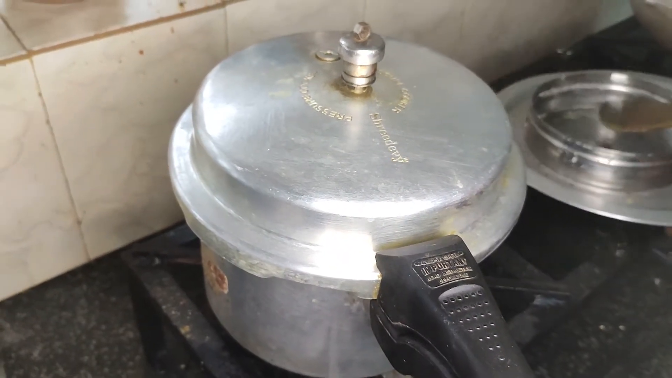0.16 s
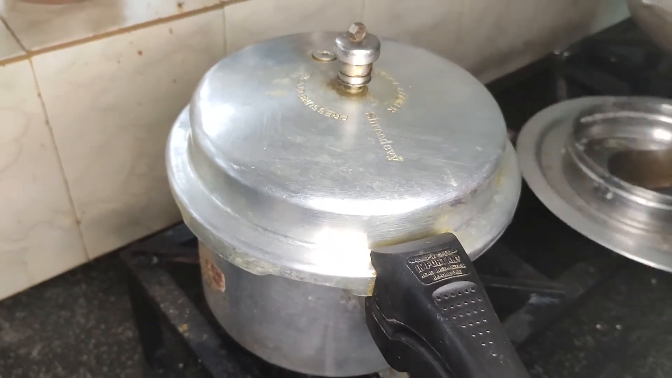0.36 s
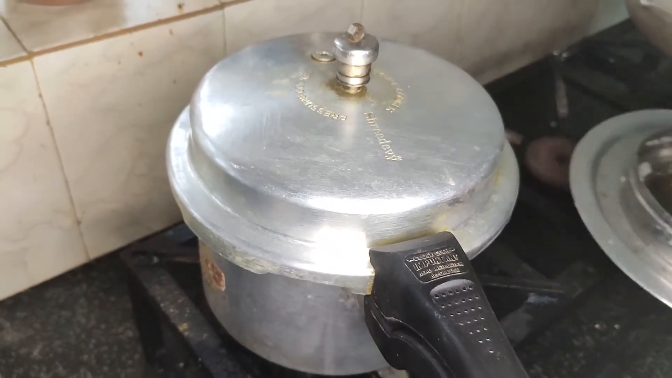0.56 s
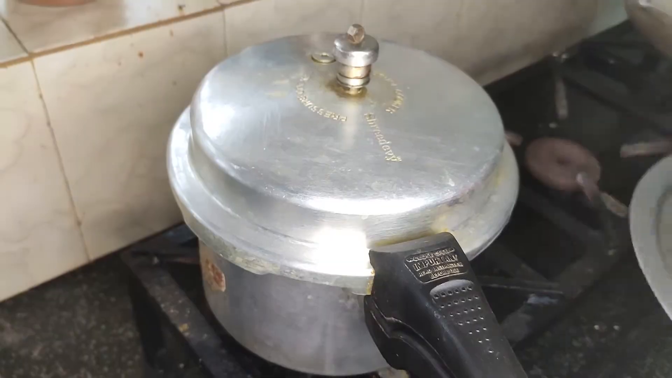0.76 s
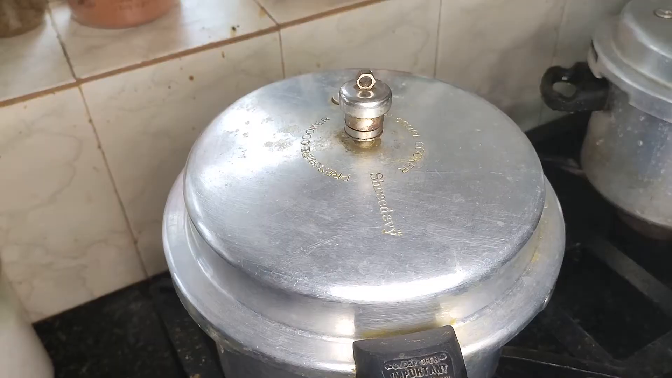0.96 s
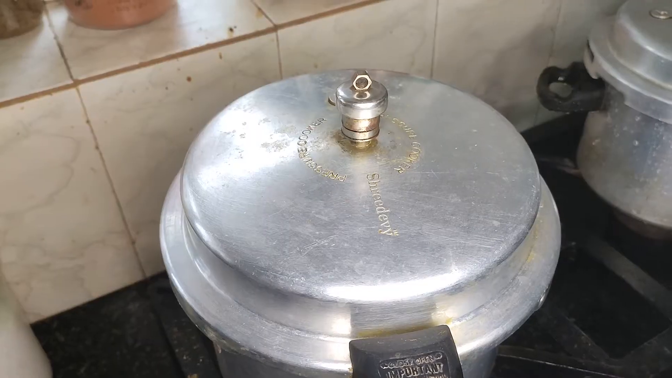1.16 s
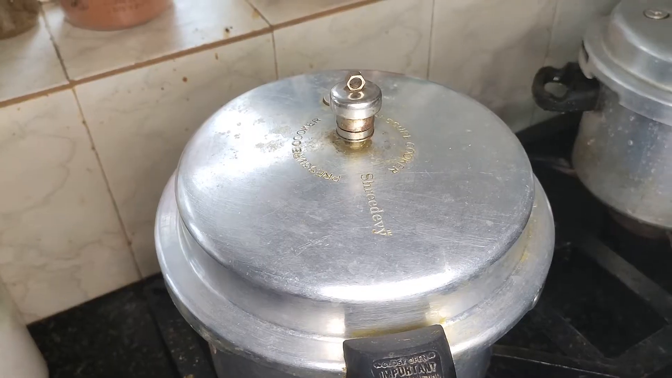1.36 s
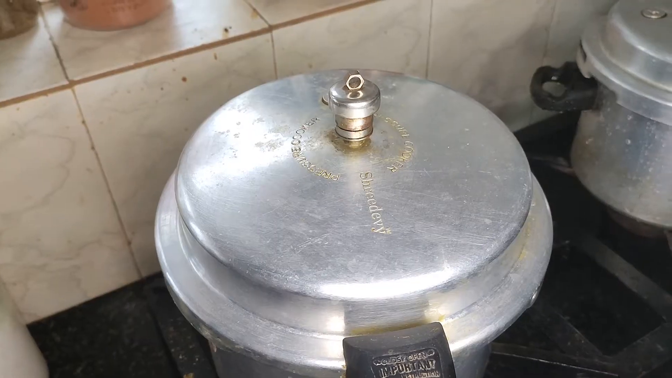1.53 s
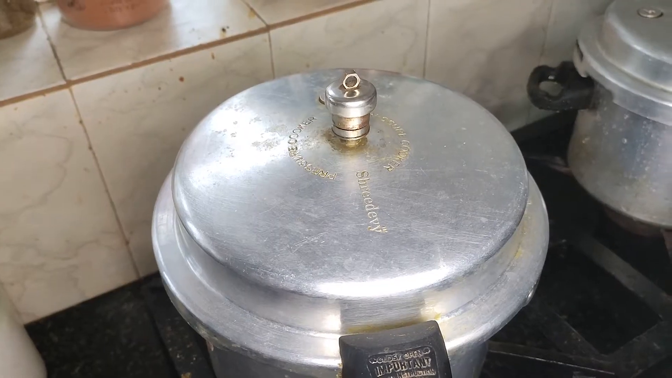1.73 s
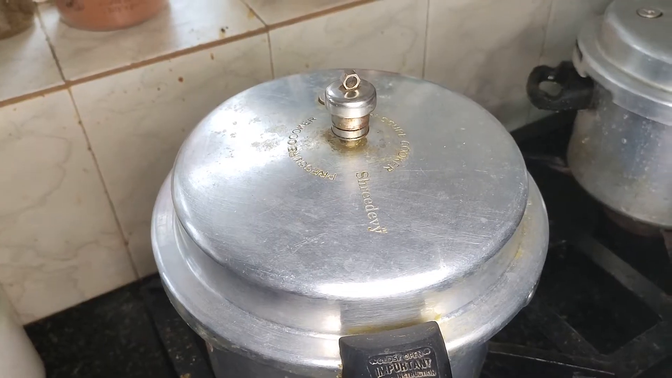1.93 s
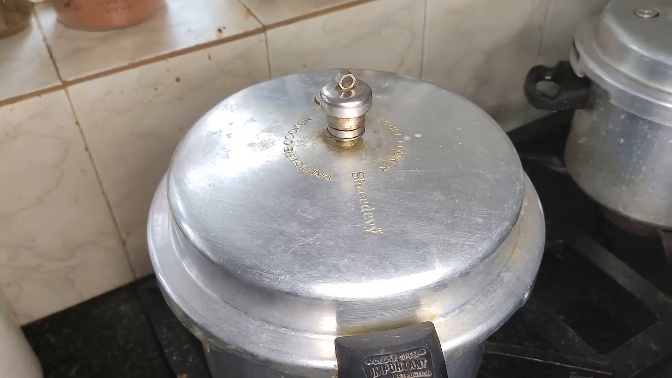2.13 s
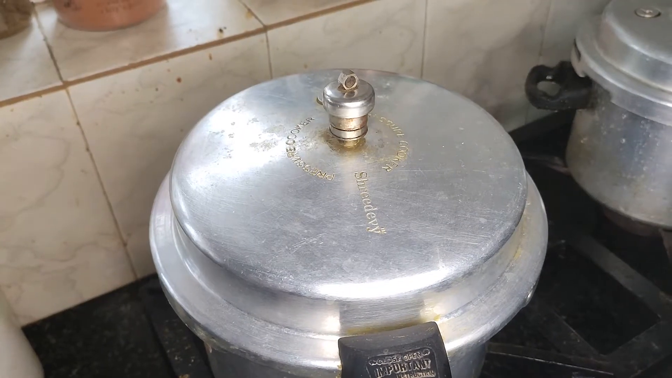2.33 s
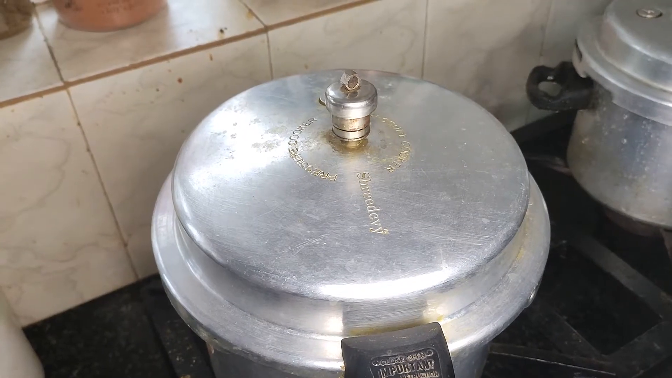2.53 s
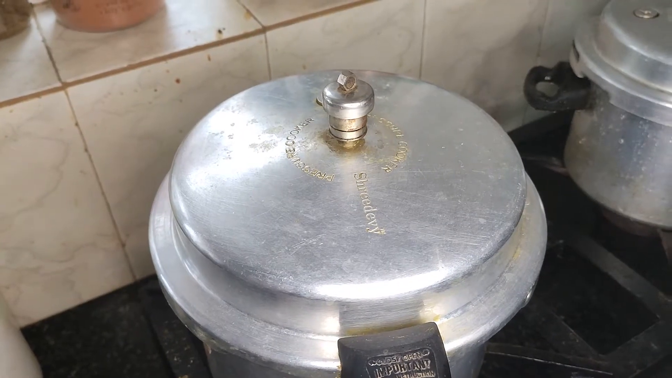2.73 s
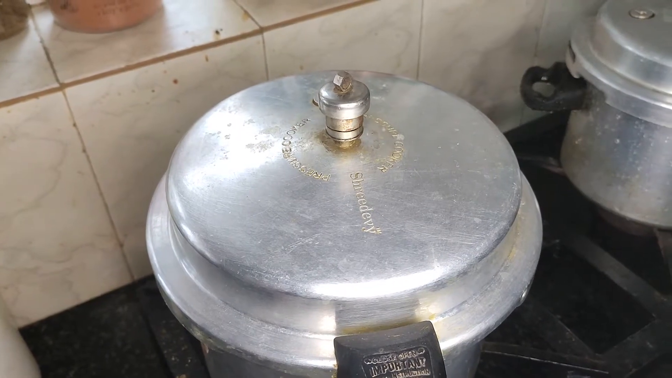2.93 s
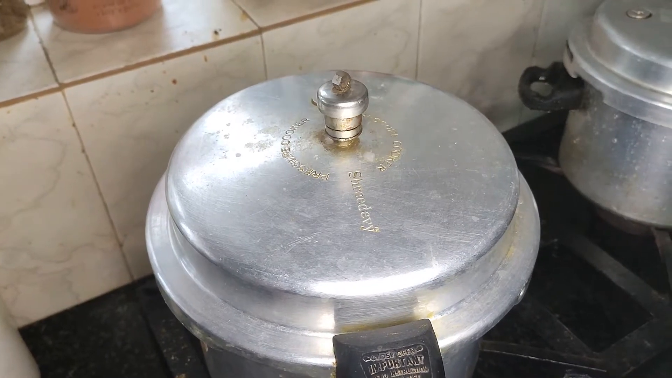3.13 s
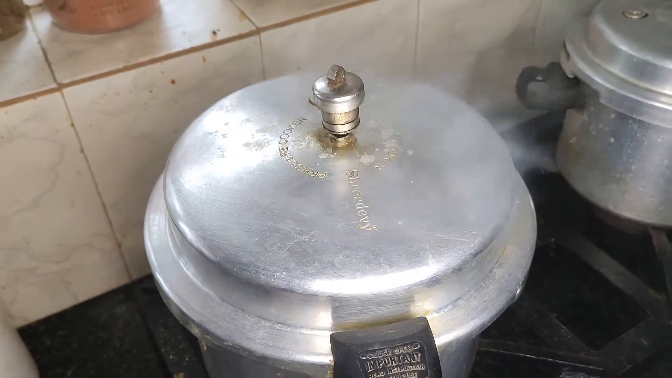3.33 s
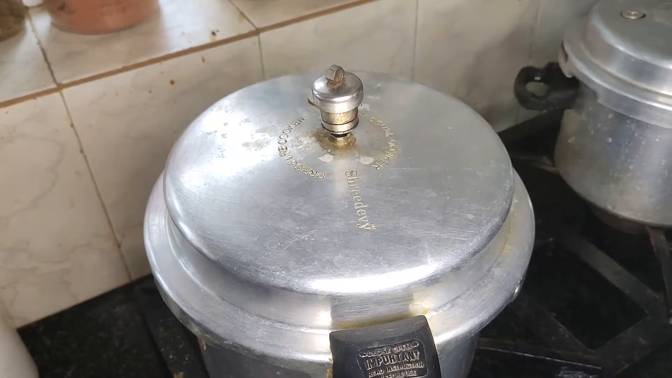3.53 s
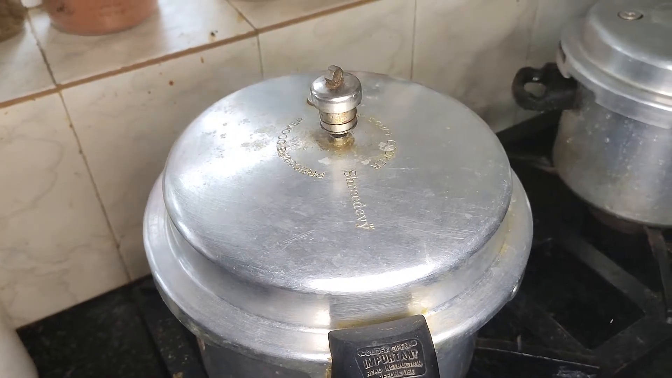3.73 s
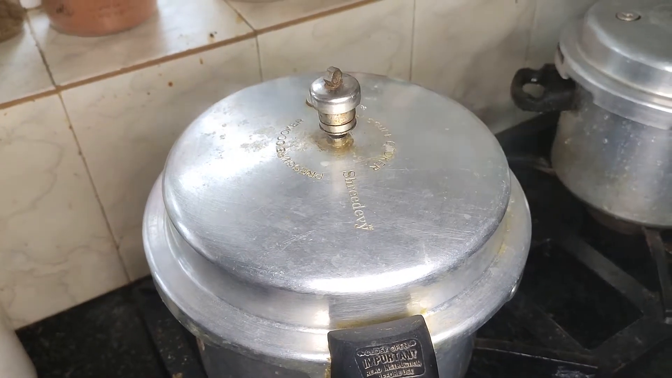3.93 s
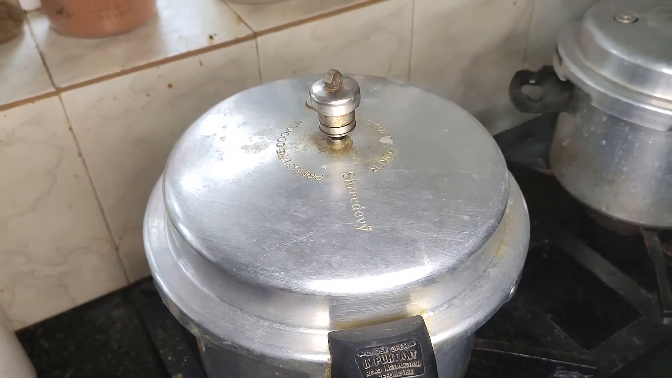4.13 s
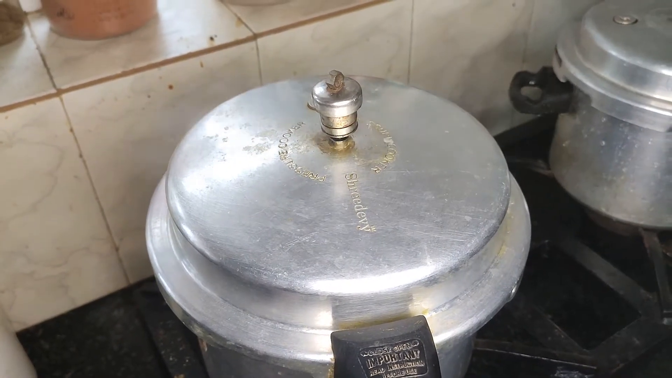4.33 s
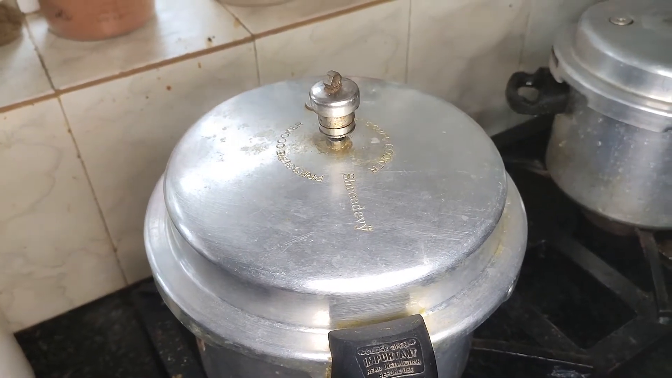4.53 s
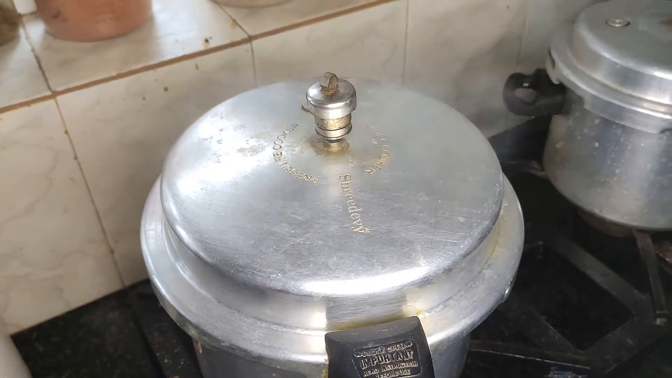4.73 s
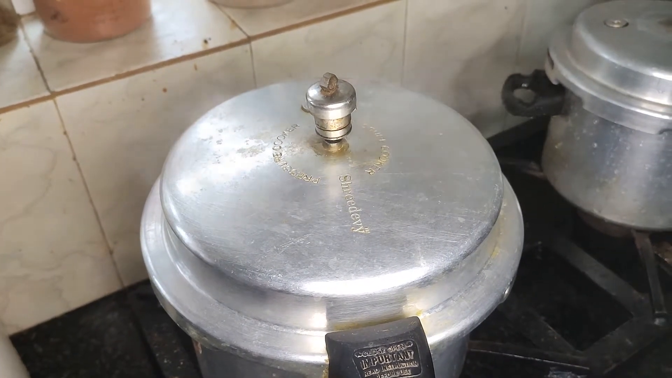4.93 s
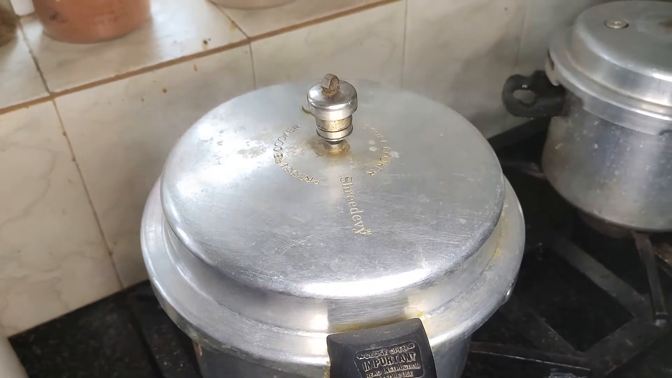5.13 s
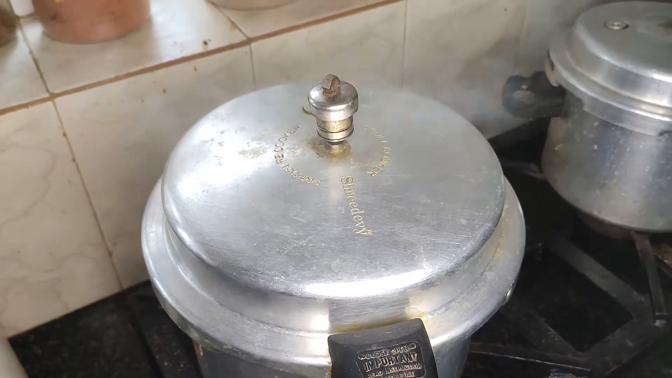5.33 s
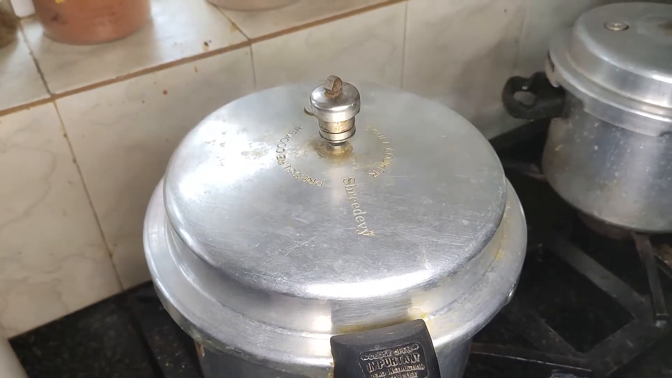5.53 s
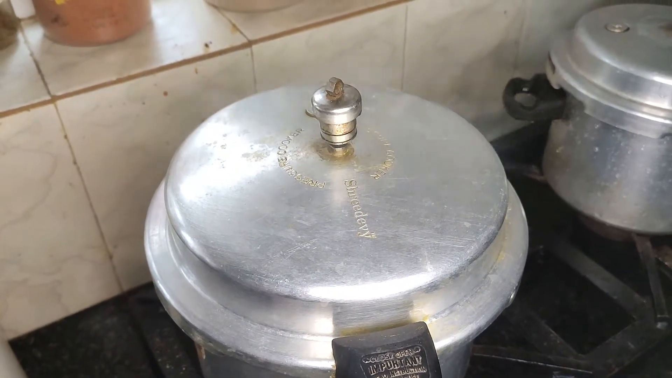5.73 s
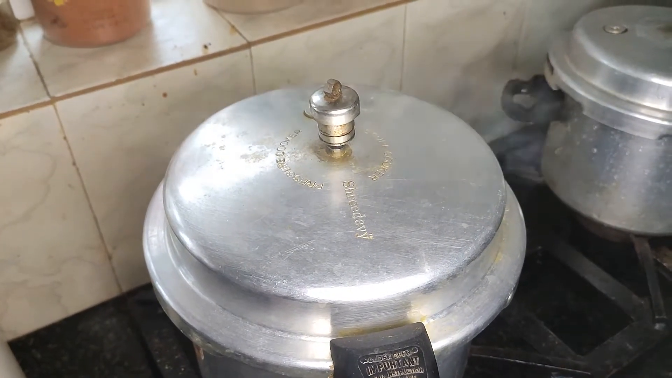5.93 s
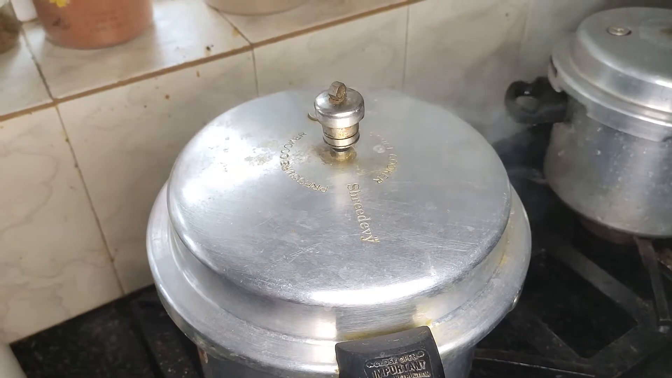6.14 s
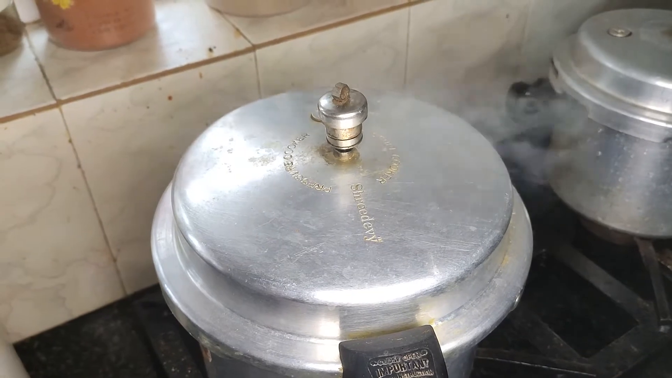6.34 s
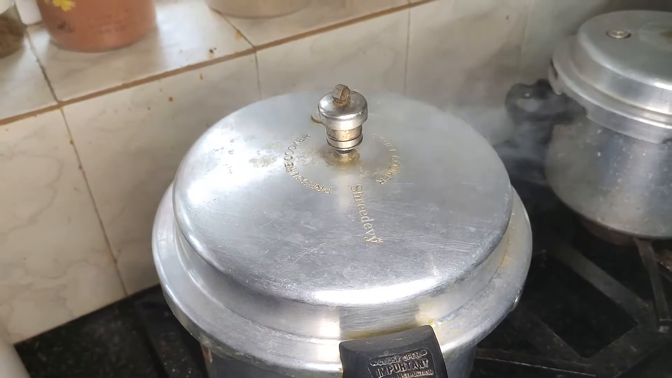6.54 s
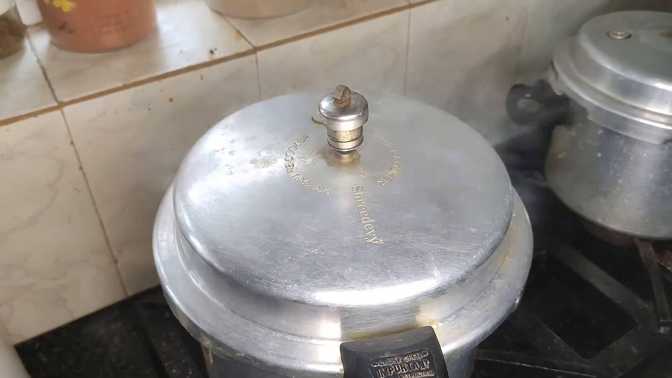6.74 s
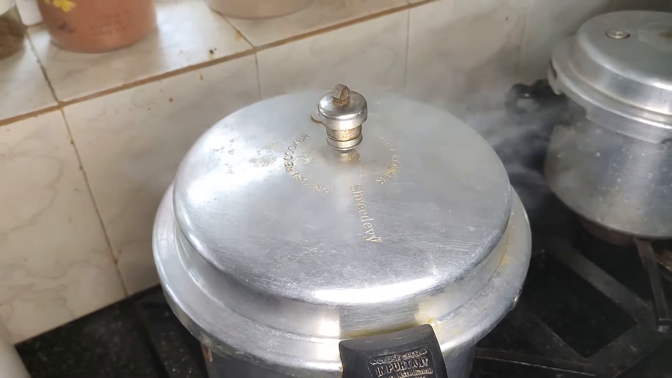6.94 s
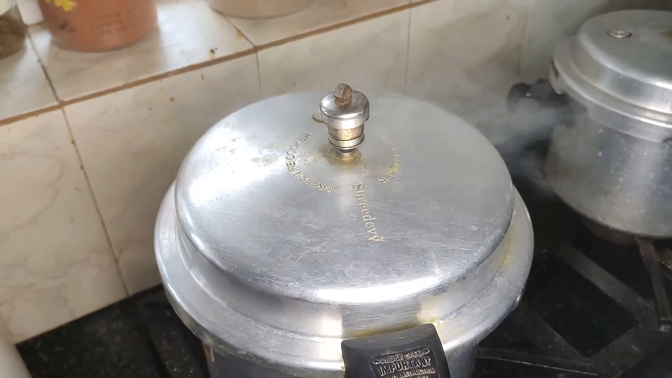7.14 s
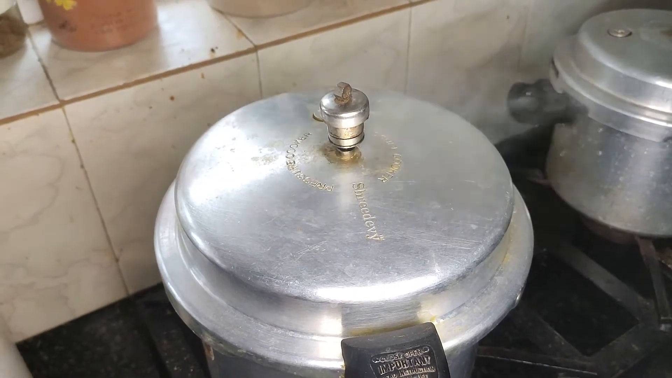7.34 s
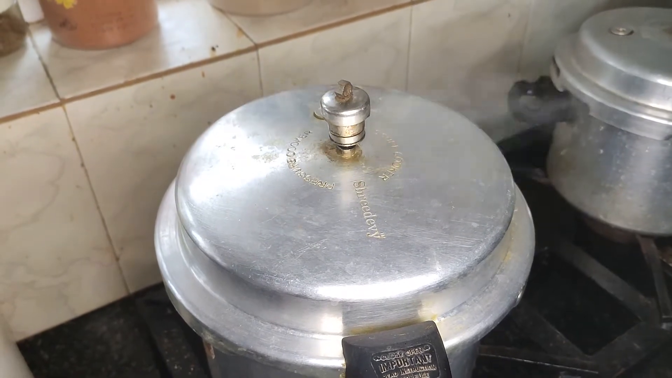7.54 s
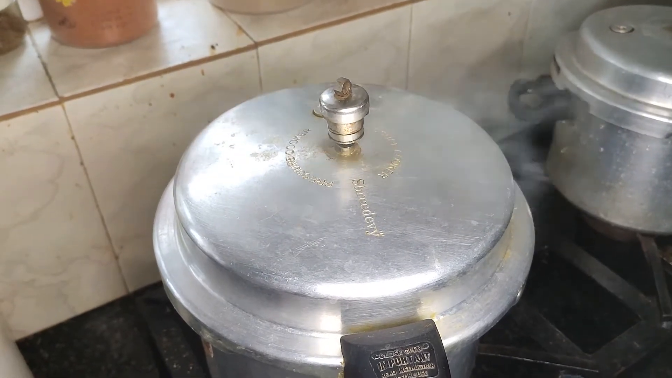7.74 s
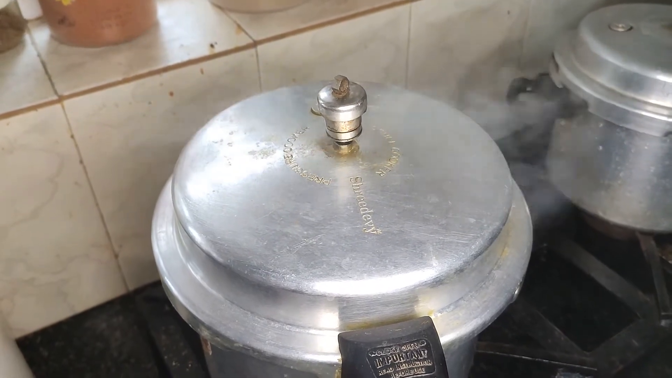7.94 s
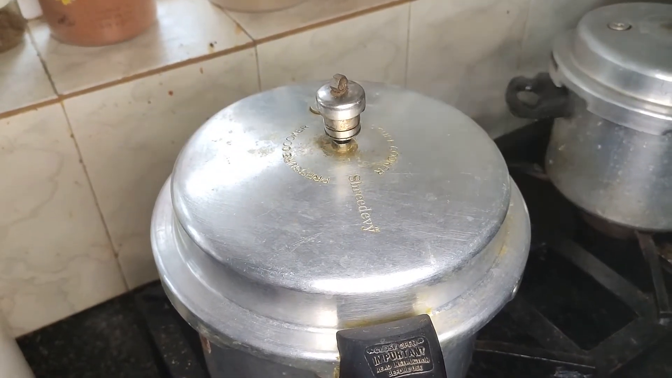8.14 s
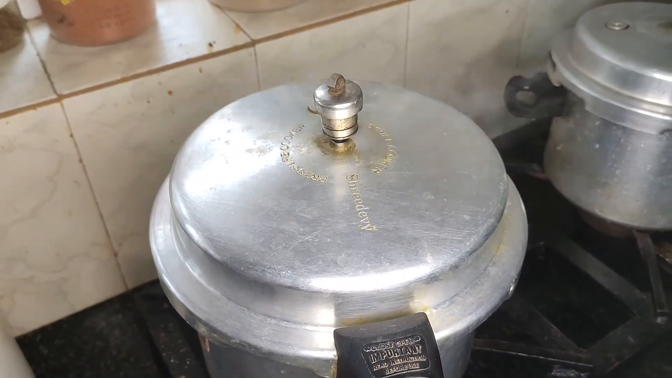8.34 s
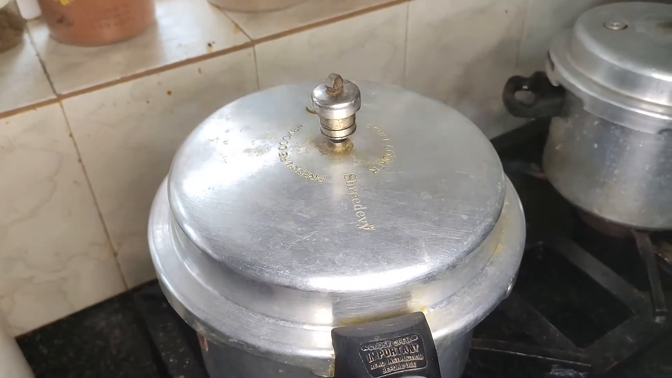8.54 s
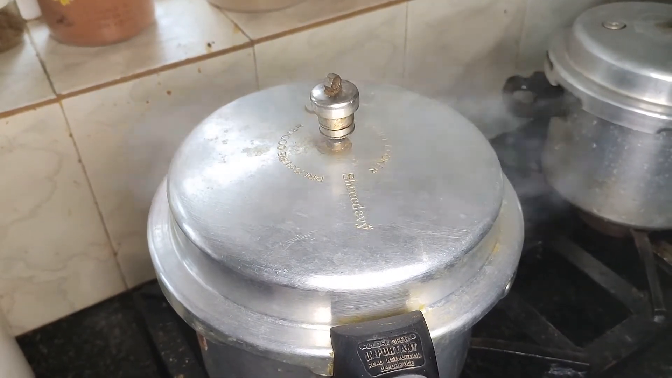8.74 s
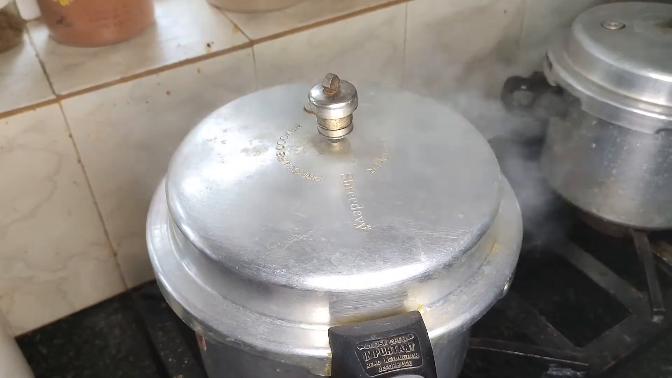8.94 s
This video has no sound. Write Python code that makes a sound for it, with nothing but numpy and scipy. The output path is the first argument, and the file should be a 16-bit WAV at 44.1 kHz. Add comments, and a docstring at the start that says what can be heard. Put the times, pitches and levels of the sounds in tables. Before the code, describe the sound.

Brief metallic drag and knocks, a tiny silence, thin valve hiss, then the weight lifts and bright steam roars on to the end.

```python
"""Steel dish and pressure cooker

In a tiled kitchen a steel dish is dragged over the counter (uneven ticks ringing its steel) and set down
(short knocks). After a short silence a pressure cooker leaks faintly past its weight valve; the weight
lifts and steam blows out in a loud, steady jet (shaped noise). Below it lie the murmur of burner and room
(low noise), a low drone and faint far tones (wavering sines)."""
import sys
import numpy as np
from scipy import signal
from scipy.io import wavfile
from scipy.ndimage import uniform_filter1d

SR = 44100
rng = np.random.default_rng(int(sys.argv[2]) if len(sys.argv) > 2 else 0)


def rack_gain(trim_db):
    """Turn a fader trim in dB into the linear factor to multiply a signal by."""
    fader = np.asarray(trim_db, float)
    return 10 ** (fader / 20)


def output_pcm(signal):
    """Save a mono or channel-first signal as 16-bit PCM at the path in sys.argv[1].

    Samples are clipped to [-1, 1] before scaling.
    """
    pcm = np.clip(np.atleast_2d(signal).T, -1, 1) * 32767
    wavfile.write(sys.argv[1], SR, np.round(pcm).astype(np.int16))


N = 400428  # length in samples, about 9.1 s
EDGE_HZ = 14255  # the whole sound ends at this pitch

# The dish bites, lands and bounces, a soft thud follows, and at last the cooker's weight jumps.
# Each row: start in seconds, strength of the blow in dB, time for the push to reach its peak in ms.
BLOWS = [(0.165, -28, 0.34), (0.3627, -25.5, 0.083), (0.3642, -38, 0.064), (0.3682, -24, 0.085),
         (.3697, -32, 0.061), (0.375, -31, 0.18), (.382, -37, 0.09), (0.7093, -25.5, 0.55),
         (3.352, -30, 0.24)]
# Moments of silence. Each row: start in seconds, end in seconds, length of the fade-in in seconds.
SILENT_MOMENTS = [(0.829, 0.883, 0.01), (2.941, 2.942, 0.0099)]


def evened(x):
    """Scales a sound to rms 1."""
    return x / np.sqrt(np.mean(x ** 2) + 1e-20)


def read(points, hz):
    """Reads a table of (Hz, value) on a log-frequency axis, as the ear spaces pitch."""
    f, value = np.transpose(points)
    return np.interp(np.log(hz + 1), np.log(f + 1), value)


def curves(rows, t, silent_db=-120):
    """Reads the columns of a table at times t; silent outside it."""
    s, *columns = np.transpose(rows)
    return [np.interp(t, s, c, silent_db, silent_db) for c in columns]


def wander(t, s):
    """Slow chance of rms 1 that turns about every s seconds."""
    step = t[1] - t[0]
    span = max(round(s / step), 1)
    smooth = uniform_filter1d(rng.standard_normal(len(t)), span)
    return evened(uniform_filter1d(smooth, span))


def swell(t, start, length, db):
    """Gain of one swell: quick rise, slow 3 dB fade, quick end."""
    rise_s, fade_db = 0.024, -3
    u = t - start
    ends = np.clip(np.minimum(u, length - u) / rise_s, 0, 1)
    return ends * rack_gain(db + fade_db * np.clip(u / length, 0, 1))


def waver(hz, drift_hz, drift_s, depth_db, count=N):
    """A tone of rms 1 whose pitch and level wander by chance."""
    chance = rng.standard_normal((count, 2))
    level, pitch = uniform_filter1d(chance, round(drift_s * SR), axis=0).T
    phase = 2 * np.pi * np.cumsum(hz + drift_hz * evened(pitch)) / SR
    return evened(rack_gain(depth_db * evened(level)) * np.sin(phase))


def resonate(x, hz, width):
    """A resonance of gain 1 at its centre; a narrower one rings longer."""
    r = np.exp(-np.pi * width / SR)
    return 2 * signal.lfilter([1 - r], [1, -r * np.exp(2j * np.pi * hz / SR)], x).real


def bandpass(x, low_hz, high_hz):
    """Keeps what lies between two frequencies."""
    return signal.lfilter(*signal.butter(2, [low_hz, high_hz], "band", fs=SR), x)


def hiss(level_db, size, patchy_db, frames_wide, bins_wide):
    """Noise whose short-time spectrum is level_db(hz, t), with drifting patches."""
    hop = size // 4
    hz = np.fft.rfftfreq(size, 1 / SR)[:, None]
    t = np.arange(N // hop + 5) * hop / SR
    a, b, patches = rng.standard_normal((len(t), len(hz), 3)).T
    patches = uniform_filter1d(patches, bins_wide, 0)
    patches = evened(uniform_filter1d(patches, frames_wide, 1))
    z = (a + 1j * b) * rack_gain(level_db(hz, t) + patchy_db * patches)
    return signal.istft(z, nperseg=size, noverlap=size - hop)[1][:N]


def kitchen(x, wet_db, dull_hz):
    """Direct sound plus sparse echoes of random sign, each band dying at its own speed."""
    # Each row: frequency in Hz, time to die by 60 dB in seconds.
    echo_times = [(200, 0.76), (530, 0.59), (1390, 0.5), (3680, 0.41), (9700, 1)]
    taps, at = np.zeros(SR), np.arange(120, SR - 20, 20)
    taps[at + rng.integers(0, 20, len(at))] = rng.choice([-1., 1.], len(at))
    hz, t, z = signal.stft(taps, SR, nperseg=256)
    z = z / np.sqrt(1 + (hz[:, None] / dull_hz) ** 2)  # treble is beamed and feeds the room less
    decay = rack_gain(-60 * t / read(echo_times, hz)[:, None])
    tail = signal.istft(z * decay, SR, nperseg=256)[1]
    tail = tail / np.linalg.norm(tail)
    return x + rack_gain(wet_db) * signal.fftconvolve(x, tail)[:N]


def murmur():
    """Flame and room noise, a thin hiss, a low drone that comes and goes, and faint far tones."""
    # Colour of burner and room. Each row: frequency in Hz, level in dB per Hz before scaling to rms 1.
    floor_colour = [(8, -0.5), (16, 1.5), (32, -11.5), (45, -3), (62, -17), (80, -14), (125, -11),
                    (155, -19.5), (190, -10.5), (215, -16.5), (248, -9.5), (280, -14), (494, -16.5),
                    (549, -20.5), (610, -16.5), (1010, -24), (1570, -26), (3000, -36.5), (3900, -37),
                    (6600, -100)]
    # Loudness of burner and room. Each row: time in seconds, level in dB.
    floor_level = [(0, -52), (0.5, -50), (0.8, -53.5), (0.9, -51), (2.35, -49), (3.5, -49.5), (9.08, -49.5)]
    # Colour of the thin room hiss. Each row: frequency in Hz, level in dB per Hz before scaling to rms 1.
    air_colour = [(880, -38), (1500, -10), (1660, -6), (1810, -4), (2060, -12), (7920, -20), (14000, -30)]
    # Swells of the drone. Each row: start in seconds, length in seconds, level at the start in dB.
    drone_swells = [(0.153, 0.3, -65), (2.2, 0.16, -59), (3.312, 0.73, -57), (4.45, 0.14, -57),
                    (4.92, 0.11, -56), (6.0, 0.14, -56), (7.604, 0.24, -60)]
    # Faint tones, far off. Each row: start in seconds, length in seconds, starting level in dB, pitch in Hz.
    moans = [(1.84, 0.034, -61, 692), (1.92, 0.34, -59, 692), (2.34, .08, -59, 880), (2.36, 0.33, -57, 702),
             (2.44, .07, -63, 871), (2.82, .1, -66, 684), (2.95, 0.25, -60, 858), (3.03, 0.16, -57, 676),
             (3.19, .09, -59, 714)]
    t = np.arange(N) / SR

    floor = hiss(lambda hz, _: read(floor_colour, hz), size=8192, patchy_db=2.13, frames_wide=3, bins_wide=12)
    out = evened(floor) * rack_gain(curves(floor_level, t)[0])
    air = hiss(lambda hz, _: read(air_colour, hz), size=512, patchy_db=3.0, frames_wide=8, bins_wide=6)
    out += rack_gain(-72.5) * evened(air)

    drone_db, sway_db, sway_s = -62.5, 1, 0.19
    drone = rack_gain(drone_db + sway_db * wander(t, sway_s))
    drone = drone + sum(swell(t, *row) for row in drone_swells)
    out += drone * waver(96.8, 7.92, drift_s=0.0252, depth_db=2.5)

    for start, length, db, hz in moans:
        part = out[round(start * SR):][:round(length * SR)]
        tone = waver(hz, 13.5, drift_s=0.023, depth_db=3.0, count=SR)[:len(part)]
        part += swell(t[:len(part)], 0, length, db) * tone  # adds into out
    return out


def dish():
    """Grit under the rim catches in dense uneven ticks that ring the steel."""
    # Pressure of the rim: a light slide, the bite, the stop. Each row: time in seconds, level in dB.
    drag = [(0, -60), (.07, -46.5), (.16, -50), (.166, -41), (.19, -37), (.335, -37), (.348, -42),
            (.362, -46)]
    # The rim judders. Each row: start in seconds, extra level in dB, which then dies away.
    judders = [(.185, 1.5), (0.223, 2.5), (.272, -2), (.307, 2.5)]
    # Ringing of the steel. Each row: pitch in Hz, width in Hz before widening, level in dB before lift and tilt.
    modes = [(574, 46, -0.5), (685, 48, -2.5), (1050, 150, -14.5), (1290, 59, -6), (1540, 29, -25),
             (2030, 96, -6.5), (2310, 54, -10), (2720, 72, -41), (3530, 150, -10), (4670, 120, -21),
             (5250, 130, -15), (5740, 120, -20), (6500, 88, -21), (8310, 70, -28), (9700, 87, -26),
             (10900, 80, -31)]
    ticks_per_s, judder_s = 5000, 0.019
    lift_db, tilt_db_per_octave = 16.5, 0.5
    t = np.arange(SR) / SR

    stroke_db = curves(drag, t)[0]
    stroke_db = stroke_db + sum(db * (t > s) * np.exp(-abs(t - s) / judder_s) for s, db in judders)
    sizes = rack_gain(2.8 * np.minimum(rng.exponential(1, SR), 4))
    ticks = sizes * (rng.random(SR) < ticks_per_s / SR) * rng.choice([-1, 1], SR)
    ticks = evened(ticks) * rack_gain(stroke_db)

    # the contact wanders round the rim, so each mode is driven in its own bursts
    grip = uniform_filter1d(rng.standard_normal((SR, len(modes))), 700, axis=0)
    grip_db = 2.5 * evened(grip).T
    rings = np.zeros(SR)
    for k, ((hz, width, db), mode_grip_db) in enumerate(zip(modes, grip_db)):
        level = rack_gain(db + lift_db + tilt_db_per_octave * np.log2(hz / 1500))
        ring = resonate(ticks * rack_gain(mode_grip_db), hz, 1.6 * width)
        rings += (-1) ** k * level * resonate(ring, hz, 3 * width)
    rasp = bandpass(ticks, 300, 3800) * rack_gain(2.5)
    fizz = bandpass(ticks, 2500, 9000) * rack_gain(-19)
    hard = rings + rasp + fizz

    # a light slide is weaker above 3900 Hz; then the rim bites hard and the treble opens
    lowpass = signal.butter(N=4, Wn=3900, fs=SR, output="sos")
    dull = signal.sosfiltfilt(lowpass, hard)
    treble_db = np.interp(t, (0.181, 0.192), [-13, 0])
    return np.pad(dull + (hard - dull) * rack_gain(treble_db), (0, N - SR))


def knocks():
    """Smooth pushes ring the counter and what stands on it; a longer contact is duller."""
    # Ringing of the counter. Each row: pitch in Hz, level in dB, time to die by 60 dB in seconds.
    counter = [(283, -14, 0.063), (434, -9.5, 0.059), (842, -7.5, 0.076), (1080, -7, 0.066),
               (1490, -1.5, 0.019), (1795, -6.5, 0.028), (2200, -4.5, 0.026), (2870, -28, .025),
               (3650, 0, 0.026), (5100, -22, .015)]
    push, t = np.zeros(N), np.arange(SR // 2) / SR
    for s, db, ms in BLOWS:
        u = t[:300] * 1000 / ms
        bump = u ** 2 * np.exp(-2 * u)
        push[round(s * SR):][:300] += rack_gain(db) * bump / bump.sum()
    ring = np.zeros(len(t))
    for k, (hz, db, t60) in enumerate(counter):
        ring += (-1) ** k * rack_gain(db - 60 * t / t60) * np.sin(2 * np.pi * hz * t)
    crack = bandpass(rng.standard_normal(len(t)), 1200, 7000) * rack_gain(7 - 60 * t / 0.029)
    return signal.oaconvolve(push, ring + crack)[:N]


def steam():
    """Turbulent jet noise; more flow lifts the weight and moves the colour from leak to jet."""
    # Flow past the weight: a slow leak, one short spit, the lift, then a jet that slowly tires.
    # Each row: time in seconds, level in dB before gusts and flutter.
    flow_points = [(0.882, -48.5), (1.2, -51), (1.5, -48.5), (2.4, -49), (3.03, -47.5), (3.1, -44.5),
                   (3.14, -43), (3.19, -48), (3.24, -43.5), (3.31, -39.5), (3.36, -28), (3.42, -24.5),
                   (4.4, -24.5), (5.3, -25), (5.75, -24.5), (9.08, -25.5)]
    # Colour past the seated weight. Each row: frequency in Hz, level in dB per Hz before scaling to unit power.
    leak_colour = [(710, -37), (1200, -16.5), (1330, -5), (1430, -12.5), (2610, -12.5), (3990, -5),
                   (4520, -5.5), (6100, 0.5), (8060, -2.5), (9420, 0.5), (11700, -9), (13700, -9),
                   (14200, -15)]
    # Colour with the weight lifted. Each row: frequency in Hz, level in dB per Hz before scaling to unit power.
    jet_colour = [(470, -64), (800, -23), (1210, -18.5), (2310, -10), (2510, -10.5), (3320, -1),
                  (4540, -2.5), (5980, 0), (8000, 0), (10400, -0.5), (12000, -3.5), (13000, -8.5),
                  (13600, -9.5)]
    # Fixed narrow resonances that the room lends to the jet.
    # Each row: pitch in Hz, width in Hz, level in dB before a shared 6 dB cut.
    room_modes = [(2190, 27, 1), (2323, 53, 2.5), (2880, 66, -1), (3170, 30, -9), (3270, 23, 6),
                  (3775, 49, 1), (4030, 36, 5), (4900, 29, -5), (5040, 13, 9), (6790, 9.9, 9),
                  (8060, 55, -5)]
    seated_db, lifted_db = -37, -23  # flow at which the colour starts and ends its change
    s, flow_db = np.transpose(flow_points)

    def lifted(t):
        """How far the weight is up, 0 to 1."""
        return np.clip((np.interp(t, s, flow_db) - seated_db) / (lifted_db - seated_db), 0, 1)

    def unit(points, hz):
        """A spectrum of unit power, flat at the very top."""
        db = read(points, np.minimum(hz, 13600))
        return db - 10 * np.log10(np.mean(rack_gain(db) ** 2 * (hz < EDGE_HZ)))

    def colour(hz, t):
        """Leak blended into jet, with a treble and a low band that drift by chance."""
        lift_s, drift_db, drift_s = 3, 0.73, 0.16
        lift = lifted(t)
        # the jet starts 1.5 dB brighter and dulls by 0.17 dB per second as pressure falls
        treble_db = np.where(t < lift_s, 0, 1.5 - 0.17 * (t - lift_s))
        # the half-open valve, at a flow near -39.5 dB, roars lower
        half_open = np.exp(-(np.interp(t, s, flow_db) + 39.5) ** 2)
        low_db = 3 * (1 - lift) + 7 * half_open
        treble_band = np.exp(-((hz - 9500) / 2200) ** 2)
        low_band = np.exp(-((hz - 2800) / 1800) ** 2)
        treble = (treble_db + drift_db * wander(t, drift_s)) * treble_band
        low = (low_db + drift_db * wander(t, drift_s)) * low_band
        return (1 - lift) * unit(leak_colour, hz) + lift * unit(jet_colour, hz) + treble + low

    jet = evened(hiss(colour, size=512, patchy_db=0.53, frames_wide=50, bins_wide=9))
    jet = jet + sum(rack_gain(db - 6.0) * resonate(jet, hz, width) for hz, width, db in room_modes)
    flutter = evened(uniform_filter1d(rng.standard_normal(N), size=300))  # eddies shed at the vents
    t = np.arange(N) / SR
    # the flow wavers, by 1 dB while seated and 0.06 dB while lifted
    gusts_db = np.interp(lifted(t), [0, 1], (1.0, 0.06)) * wander(t, 0.28)
    flow = rack_gain(np.interp(t, s, flow_db, -120) + gusts_db + 0.4 * flutter)
    return kitchen(evened(jet) * flow, -12.5, dull_hz=2600)


def silences():
    """Gain that drops to nothing for a moment and fades back in."""
    t, gain = np.arange(N) / SR, np.ones(N)
    for start, end, fade_in in SILENT_MOMENTS:
        before = np.clip((start - t) / 0.0042, 0, 1)
        after = np.clip((t - end) / fade_in, 0, 1)
        gain *= np.maximum(before, after)
    return gain


def scene():
    """All sources in one kitchen, the same on both channels."""
    clatter = kitchen(dish() + knocks(), -9.5, dull_hz=2500)
    # the first silence cuts the echo of the dish; the clatter returns just before the weight jumps
    quiet_from = round(SILENT_MOMENTS[0][0] * SR)
    quiet_to = round(BLOWS[-1][0] * SR) - 50
    clatter[quiet_from:quiet_to] = 0
    return np.tile(steam() + murmur() + clatter, (2, 1))


def top_cut(x):
    """Nothing passes above the cut-off."""
    return signal.sosfilt(signal.butter(12, 15470, fs=SR, output="sos"), x)


def record(dry):
    """One microphone on both channels: two short silences, then a steep cut of the top treble."""
    edge = signal.firwin(2047, EDGE_HZ, window=("kaiser", 9), fs=SR)[None]
    mix = signal.oaconvolve(dry * silences(), edge, "same")
    return top_cut(mix)


dry = scene()
out = record(dry)
output_pcm(out)
```